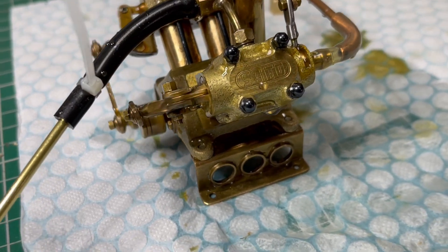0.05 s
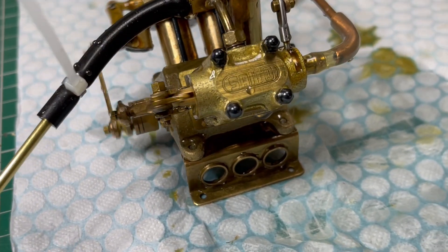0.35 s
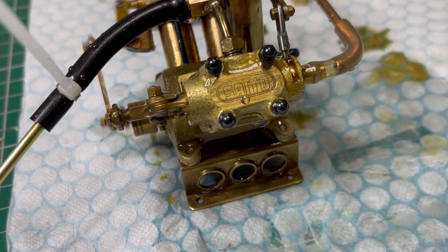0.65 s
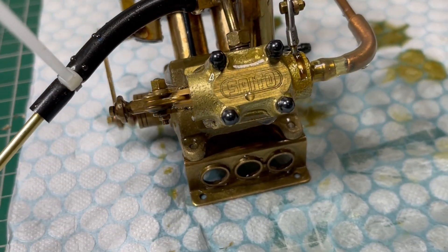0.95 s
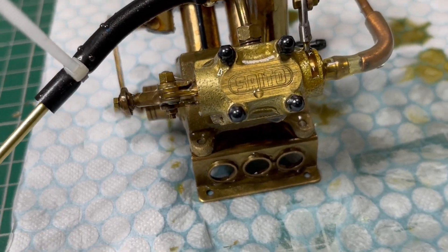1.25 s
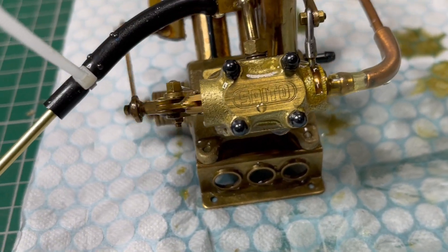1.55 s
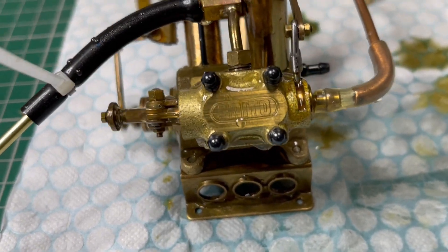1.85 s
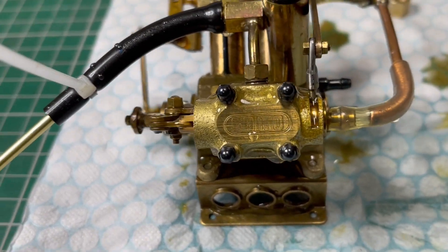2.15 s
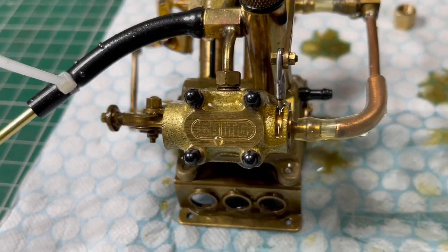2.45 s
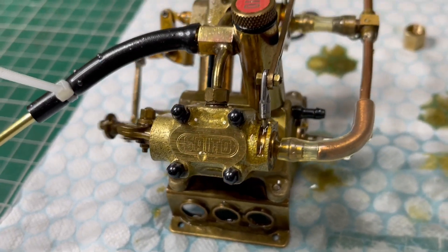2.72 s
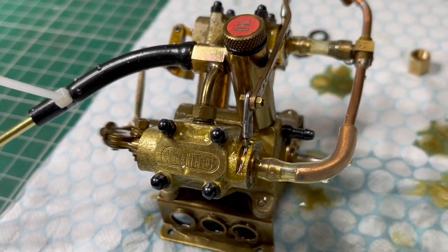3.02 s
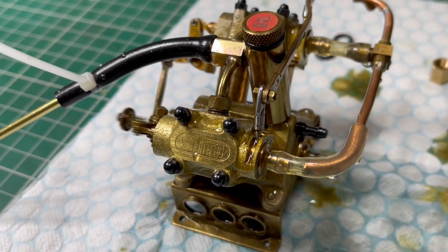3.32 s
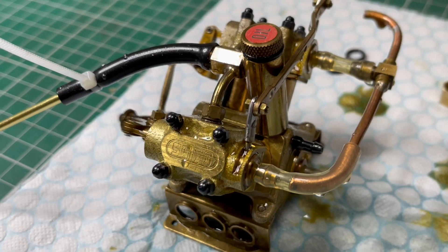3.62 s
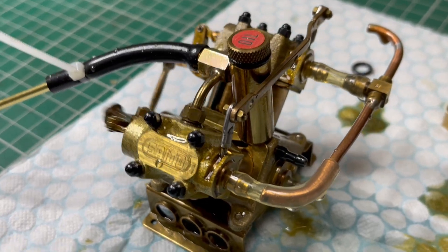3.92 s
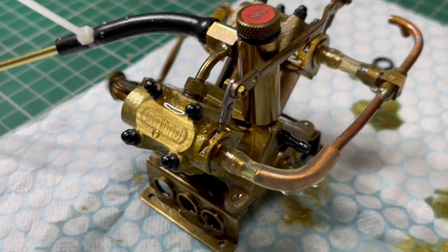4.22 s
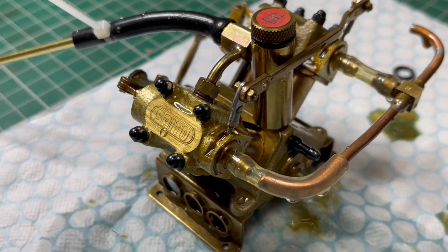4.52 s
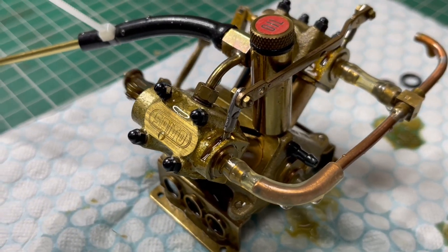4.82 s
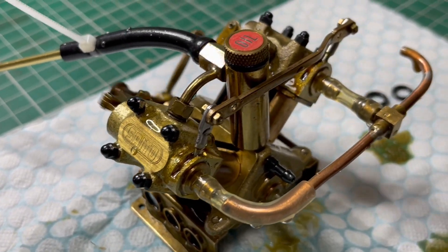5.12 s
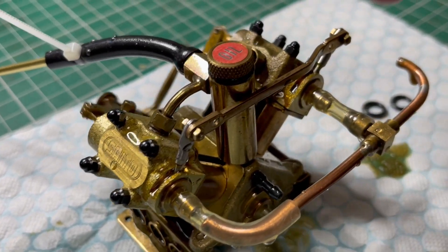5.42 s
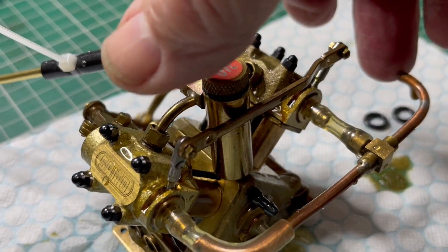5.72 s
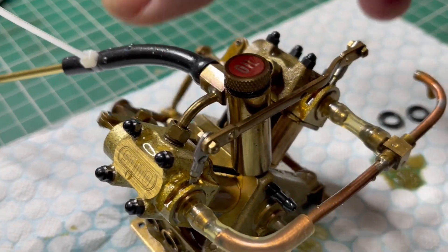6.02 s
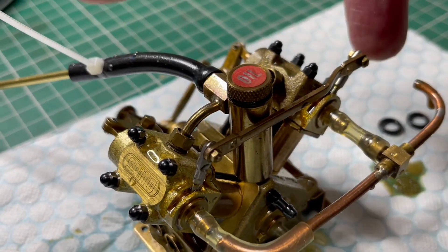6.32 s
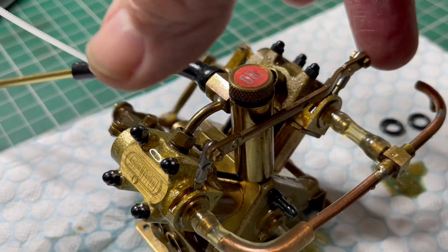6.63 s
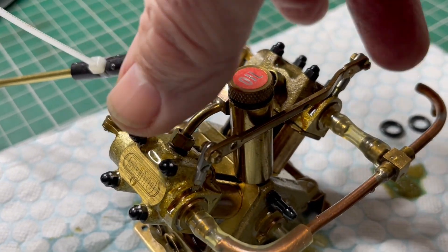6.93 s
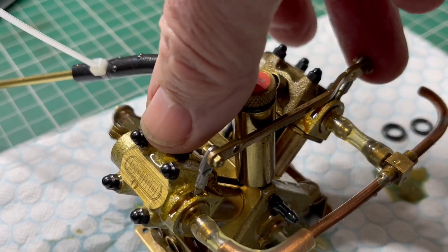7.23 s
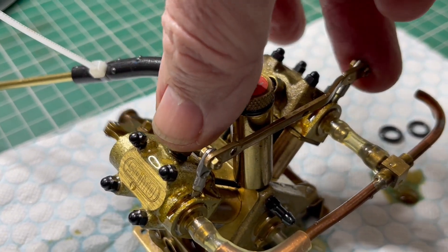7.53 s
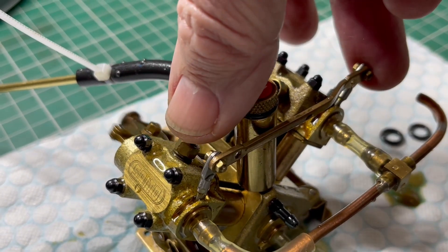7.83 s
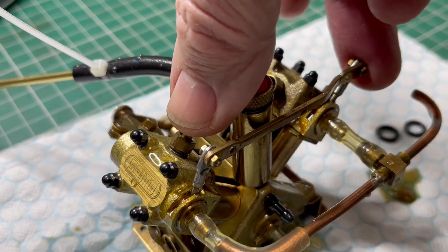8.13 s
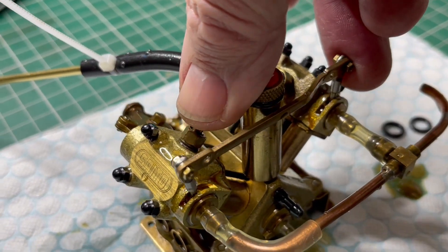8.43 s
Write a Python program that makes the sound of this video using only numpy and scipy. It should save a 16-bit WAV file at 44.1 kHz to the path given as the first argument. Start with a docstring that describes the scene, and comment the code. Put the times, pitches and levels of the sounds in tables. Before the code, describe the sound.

Heard from a close microphone moving around a workshop bench, a miniature steam engine chuffs fast and evenly, its rods clattering and its valves spitting air. The clatter softens midway, then a rush of air and a brief stumble interrupt the rhythm. The engine picks up again and runs until it stops abruptly at the very end, still hissing. A supply pump hums quietly and a distant vehicle drones underneath.

```python
"""A rapid chuffing, clacking and hissing: a small brass two-cylinder steam engine runs on compressed air.
Each turn gives four exhaust puffs, two clacks of the rods and a pulsing leak past the valves.
A finger nudges the reversing lever (the engine falters), then sets neutral: the beat stops, the leak
hisses on. The listener moves round the workbench; a supply pump hums and a vehicle drones far off."""
import sys
import numpy as np
from scipy import signal
from scipy.fft import rfft, irfft, next_fast_len
from scipy.io import wavfile
from scipy.ndimage import uniform_filter1d, map_coordinates

SR = 44100
rng = np.random.default_rng(int(sys.argv[2]) if len(sys.argv) > 2 else 0)


def master_out(mix):
    """Clip the mix to full scale and print it as 16-bit PCM to the path in sys.argv[1]."""
    frames = np.transpose(np.atleast_2d(mix))
    ceiling = np.clip(frames, -1, 1)
    pcm = np.round(ceiling * 32767).astype(np.int16)
    wavfile.write(sys.argv[1], SR, pcm)


N = 377496

STOP_S = 8.245  # the lever reaches neutral
FALTER_S, FALTER_LENGTH_S = 5.828, .065  # the half-moved lever starves the cylinders: centre, half length
# listener's path: t/s, place (0 at the cylinder, 1 above, 2 at the lever, 3 there under the hand)
VIEW = [(0, 0.3), (1.4, 0), (3, 1), (5, 1), (5.9, 1.5), (6.02, 2.5), (6.15, 3), (6.55, 3), (6.9, 2),
        (8.56, 3)]
# lever touches open the leak and shake the linkage: t/s, half length/s, sizzle gain/dB, clatter gain/dB
NUDGES = [(5.693, 0.088, 6.5, -2.5), (5.943, .06, 7, -1), (6.27, 0.23, 1.5, 6), (6.423, 0.065, 4.5, 5)]


def amp(db):
    """Decibels to amplitude ratio."""
    return 10 ** (np.asarray(db) / 20)


def unit(x):
    """Normalisation to rms 1."""
    return x / np.sqrt(np.mean(x ** 2) + 1e-20)


def clock():
    """Sample times, t/s."""
    return np.arange(N) / SR


def tone(cycles):
    """Sinusoid of rms 1 from its phase in cycles."""
    return np.sqrt(2) * np.sin(2 * np.pi * cycles)


def curves(rows):
    """Linear interpolation in time of each column after the first."""
    times, *columns = np.transpose(rows)
    return [np.interp(clock(), times, column) for column in columns]


def swell(centre_s, length_s):
    """Gaussian envelope of height 1."""
    return np.exp(-((clock() - centre_s) / length_s) ** 2)


def wobble(rate):
    """Smooth random modulation: a spline through rate knots a second."""
    return map_coordinates(rng.standard_normal(int(N * rate / SR) + 4), [np.arange(N) * rate / SR])


def colour(points):
    """Magnitude response through (f/Hz, gain/dB) points on a logarithmic frequency axis."""
    f, db = np.transpose(points)
    return lambda hz: amp(np.interp(np.log(hz + 1), np.log(f + 1), db))


def resonances(modes):
    """Superposition of damped modes (f/Hz, bandwidth/Hz, gain/dB) of alternating sign."""
    return lambda f: sum((-1) ** k * amp(db) * 1j * f * width / (hz * hz - f * f + 1j * f * width)
                         for k, (hz, width, db) in enumerate(modes))


def filtered(x, response):
    """Linear filtering: the spectrum times a frequency response."""
    size = next_fast_len(N + SR // 2)
    return irfft(rfft(x, size) * response(np.fft.rfftfreq(size, 1 / SR)), size)[..., :N]


def noise(response):
    """Filtered Gaussian noise of rms 1."""
    return unit(filtered(rng.standard_normal(N), response))


def from_view(levels_db):
    """Level along the listener's path, interpolated between places."""
    return np.interp(curves(VIEW)[0], np.arange(len(levels_db)), levels_db)


def crank(start_turn=-.153, sag_hz=1.281):
    """Crank position in turns is the integral of its speed, which sags in the falter."""
    # speed, drifting with the air supply: t/s, rotation rate/Hz
    speed = [(0.0, 18.123), (0.554, 18.209), (1.743, 18.125), (2.197, 18.334), (3.804, 18.279),
             (4.053, 17.964), (5.327, 17.827), (5.522, 17.965), (7.967, 18.047), (8.24, 17.706)]
    rate_hz = curves(speed)[0] - sag_hz * swell(FALTER_S, FALTER_LENGTH_S)
    return start_turn + np.cumsum(rate_hz) / SR


def crossings(turn, position):
    """Instants of equal crank phase, until the engine stops."""
    times = np.interp(np.arange(-1, turn[-1]) + position, turn, clock(), left=-1)
    return times[(times > 0) & (times < STOP_S)]


def rumble(level_db=-49):
    """Broadband noise from across the room, strongest in the bass."""
    # spectrum: f/Hz, relative level/dB
    spectrum = [(20, -46), (31, -34), (50, -6), (80, -6.5), (130, -15), (190, -13), (300, -14.5),
                (600, -16), (1100, -17), (1600, -27.5), (4000, -27), (15000, -73)]
    return amp(level_db) * noise(colour(spectrum))


def vehicle():
    """Transmission through walls leaves only the firing fundamental of a far engine."""
    # the drone climbs, drops back and climbs again: t/s, f/Hz, rms level/dB
    drone = [(0, 44, -62), (.9, 50, -51), (1.6, 55, -53), (2.25, 59, -56), (2.6, 62, -49), (3.1, 66, -53),
             (3.7, 68, -62), (4.0, 46, -66), (4.35, 49, -50), (4.8, 54, -58), (5.15, 58, -49),
             (5.75, 63, -45.5), (6.1, 66, -52), (6.7, 70, -51), (7.15, 72, -44.5), (7.6, 73, -53),
             (8.2, 74, -52), (8.56, 74, -60)]
    hz, db = curves(drone)
    return amp(db) * tone(np.cumsum(hz) / SR)


def whine(waver_db=2):
    """Beating: the pump motor's tone lies close to a ring of the casing."""
    # tones: f/Hz, level/dB at the cylinder, above, at the lever
    tones = [(960.2, -72, -62, -62), (946, -76, -66, -66)]
    return sum(amp(from_view(db) + waver_db * wobble(3.03)) * tone(hz * clock() + rng.random())
               for hz, *db in tones)


def pump(stroke_hz=23.89, waver_db=1, flutter_db=1.6):
    """Periodic forcing: the supply pump's strokes give a harmonic hum and ring its casing."""
    # harmonics 2 to 6 of the stroke rate: rms level/dB
    harmonics = [-54, -56, -50.5, -57.5, -58]
    # casing modes: f/Hz, bandwidth/Hz, gain/dB at the cylinder, above, at the lever
    casing = [(236, 20, -65, -63, -61), (428, 19, -65, -72, -67), (574, 22, -61, -64, -59),
              (690, 140, -66, -67, -66), (838, 30, -66, -66, -67), (888, 40, -55.5, -58, -66),
              (945, 66, -65, -58, -58), (1076, 43, -57.5, -63.5, -68), (1123, 40, -62, -63, -67),
              (1220, 45, -64, -67, -68), (1337, 25, -69, -73, -74)]
    cycle = stroke_hz * clock() + .001 * wobble(3)
    hum = sum(amp(db + waver_db * wobble(12)) * tone(order * cycle + rng.random())
              for order, db in enumerate(harmonics, 2))
    impulses = np.diff(np.floor(cycle), prepend=0) * SR / stroke_hz / np.sqrt(2)
    force = impulses * amp(flutter_db * wobble(30))
    ring = sum(amp(from_view(db)) * filtered(force, lambda f: resonances([(hz, width, 0)])(f) ** 2)
               for hz, width, *db in casing)
    return hum + ring


def room(x, t60=.12):
    """Reverberation: the workshop's diffuse field decays exponentially, differently in each channel."""
    # reverberant response: f/Hz, gain/dB
    response = [(30, -28), (100, -19), (300, -17), (600, -9.5), (1100, -3), (1600, -3.5), (2200, -40),
                (5000, -26), (11000, -20)]
    t = clock()[:SR // 3]
    tail = rng.standard_normal((2, len(t))) * amp(-60 * t / t60) * (t > .002)
    wet = signal.fftconvolve(x[None], tail / np.linalg.norm(tail[0]), axes=1)[:, :N]
    return filtered(wet, colour(response))


def echoes(x, travel_s=6, oversample=4):
    """Comb filtering: reflections off the bench and nearby parts shift as the listener moves."""
    # reflections: delay/ms at the start, delay/ms at the lever, amplitude ratio
    reflections = [(1.04, 1.18, 0.085), (2.098, 2.5, 0.069), (3.3, 3.9, -0.092), (4.6, 5.3, 0.03),
                   (7, 6.3, 0.17)]
    travel = np.clip(clock() / travel_s, 0, 1)
    fine = signal.resample_poly(x, oversample, 1)
    out = x
    for first_ms, last_ms, gain in reflections:
        delay_s = (first_ms + (last_ms - first_ms) * travel) / 1000
        out = out + gain * fine[np.maximum((clock() - delay_s) * SR * oversample, 0).astype(int)]
    return out * np.std(x) / np.std(out)


def squeak(at_s=3.298, level_db=-39, attack_s=.0091, release_s=.02):
    """Friction: a short rub beside the engine excites a few narrow modes."""
    # modes: f/Hz, bandwidth/Hz, relative level/dB
    modes = [(880, 97, 0.5), (1120, 110, -2.5), (1320, 90, -2), (1626, 59, 3), (2180, 160, -15),
             (2580, 180, -8)]
    since = clock() - at_s
    envelope = np.exp(-np.abs(since) / np.where(since < 0, attack_s, release_s))
    return amp(level_db) * envelope * noise(resonances(modes))


def shake(turn, fourth_db=-51.5, sixth_db=-51):
    """Forced vibration: the moving parts rock the bench at the fourth and sixth crank orders."""
    running = np.clip((STOP_S - clock()) / .029, 0, 1)
    fourth = tone(4 * turn) * amp(fourth_db + wobble(8.7))
    sixth = tone(6 * turn) * amp(sixth_db + wobble(24))
    return running * (fourth + sixth)


def valve_opening(turn):
    """Amplitude modulation, in dB, as the valves uncover (+) and cover (-) the leak."""
    # valve events: crank position/turns, gain/dB, lead-in/turns, fade/turns
    events = [(.185, 6.5, 0.066, 0.053), (.445, -10.5, 0.11, 0.022), (.7, 11, 0.039, 0.14),
              (.92, -7, 0.082, 0.047)]
    opening_db = 0
    for position, db, lead, fade in events:
        past = (turn - position + .5) % 1 - .5
        opening_db = opening_db + db * np.exp(-np.abs(past) / np.where(past < 0, lead, fade))
    return opening_db


def jet(turn, start_s=5.67, end_s=6.01, attack_s=.21, release_s=.042, level_db=-36.5, follow=.87):
    """Jet noise: air blows past the half-moved reversing valve, partly chopped by the strokes."""
    # spectrum: f/Hz, relative level/dB
    spectrum = [(3500, -18.5), (5000, -42.5), (6200, -11.5), (7500, -3.5), (8800, -1), (9800, -10),
                (10400, -27.5), (12000, -42)]
    t = clock()
    envelope = np.exp(np.minimum(t - start_s, 0) / attack_s - np.maximum(t - end_s, 0) / release_s)
    chopped = noise(colour(spectrum)) * amp(follow * valve_opening(turn) + wobble(300))
    return unit(chopped) * amp(level_db) * envelope


def drifting(x, depth_db=1.5):
    """Spectral modulation: the colour of a hiss drifts in slow, narrow patches."""
    spectra = signal.stft(x, nperseg=512)[2]
    patches = uniform_filter1d(rng.standard_normal(spectra.shape), size=3, axis=0)
    patches = uniform_filter1d(patches, size=90, axis=1)
    return signal.istft(spectra * amp(depth_db * unit(patches)), nperseg=512)[1][:N]


def ringing_noise(response):
    """Resonances of the metalwork colour noise differently at each listening place."""
    # resonances at the four places: f/Hz, bandwidth/Hz, lift/dB
    at_cylinder = [(2070, 270, 7.5), (2930, 270, 8), (3500, 300, -11), (4520, 320, 6.5), (5720, 1300, 4.5),
                   (7460, 1400, 2.5), (9050, 270, 4.5), (11400, 150, 3), (11570, 140, 4), (11700, 200, 1.5),
                   (12000, 250, -3)]
    from_above = [(1950, 460, 4.5), (2700, 680, 5.5), (3270, 270, 1), (4230, 600, 4), (5670, 190, 0),
                  (7880, 920, 6), (8830, 500, 5.5), (11050, 98, 12.5), (10600, 88, -7), (11440, 200, 3.5),
                  (11960, 300, 7)]
    at_lever = [(2400, 740, 9.5), (3970, 300, 4.5), (4430, 220, -1), (4848, 260, 3), (5780, 1000, 9.5),
                (8880, 210, 14), (9100, 130, -5.5), (11030, 940, 11), (11600, 160, -9), (11460, 340, 9.5)]
    under_hand = [(2300, 760, 4.5), (4120, 300, 6), (4920, 370, 6), (5720, 250, 8.5), (6300, 400, -3),
                  (7950, 400, 3), (8850, 250, 8.5), (9300, 330, 2), (9930, 120, 6), (11120, 550, 14),
                  (11780, 440, 8.5), (12400, 350, 2)]
    view = curves(VIEW)[0]
    out = 0
    for place, modes in enumerate([at_cylinder, from_above, at_lever, under_hand]):
        lift = lambda f: amp(sum(db / (1 + (2 * (f - hz) / width) ** 2) for hz, width, db in modes))
        power_share = np.clip(1 - np.abs(view - place), 0, 1)
        out = out + np.sqrt(power_share) * noise(lambda f: response(f) * lift(f))
    return drifting(out)


def leak(turn, hiss_db=-39.5, spit_db=1.57, neutral_db=4):
    """Turbulence: air spits through oil in step with the valves, and flows on steadily in neutral."""
    # spectra of the omnidirectional hiss and the high, beamed sizzle: f/Hz, relative level/dB
    hiss_spectrum = [(500, -14), (1400, -5), (2400, -11), (3650, -9.5), (4100, -1.5), (5700, -1.5),
                     (6900, 0), (7900, 3.5), (8900, 0.5), (9900, -1), (10300, -13), (11000, -15)]
    sizzle_spectrum = [(9500, -35), (10300, -24), (10650, 0), (11100, -3.7), (11900, -1.5), (12500, -3.8),
                       (13000, -29), (13600, -50), (14400, -52), (14800, -25), (15800, -17.5)]
    # sizzle as the listener crosses its beam: t/s, level/dB
    beam = [(0, -43), (2.2, -38.5), (3.2, -40.5), (4.4, -37.5), (5.35, -36), (8.2, -35.5)]
    running = np.clip((STOP_S - clock()) / .023, 0, 1)
    opening_db = running * valve_opening(turn)
    nudged_db = sum(db * swell(s, length) for s, length, db, _ in NUDGES)
    sizzle_db = curves(beam)[0] + nudged_db + neutral_db * (1 - running)  # idle cylinders take no air
    hiss = ringing_noise(colour(hiss_spectrum)) * amp(.62 * opening_db + spit_db * wobble(500))
    sizzle = ringing_noise(colour(sizzle_spectrum)) * amp(opening_db + spit_db * wobble(500))
    return unit(hiss) * amp(hiss_db) + unit(sizzle) * amp(sizzle_db)


def clack(at_s, rattle_s=.0014, size=2048):
    """Impact excitation: a brief rattle rings the brass frame, heard from the listener's place."""
    # frame modes: f/Hz, bandwidth/Hz, relative level/dB at the cylinder, above, at the lever
    brass = [(1116, 140, -6, -10, -18.5), (2027, 250, 0, -11, -13), (2390, 430, -33, -10, -8),
             (2890, 380, -3, -9.5, -7.5), (4170, 340, -6, 2.5, 2), (4460, 730, 5, -0.5, -28),
             (4870, 390, 4, -2.5, 4), (5540, 340, 5, -4.5, 1), (8000, 6000, -25, -16, -28),
             (11040, 740, -5, -8.5, -1)]
    view = np.interp(at_s, *np.transpose(VIEW))
    f = np.fft.rfftfreq(size, 1 / SR)
    frame = sum(amp(np.interp(view, np.arange(len(db)), db)) * resonances([(hz, width, 0)])(f) ** 2
                for hz, width, *db in brass)
    rattle = rng.standard_normal(size) * np.exp(-np.arange(size) / SR / rattle_s)
    ring = irfft(rfft(rattle) * frame)
    return ring * np.sqrt(.004 * SR) / np.linalg.norm(ring)  # the energy of 4 ms at rms 1


def clatter(turn, scatter_db=1.5, knock_db=-1, falter_db=-21):
    """Backlash: the rods take up their play at each dead centre, now and then with a hard knock."""
    # dead centres: crank position/turns, relative level/dB
    dead_centres = [(.185, -4.5), (.695, -2)]
    # hard knocks: t/s, level/dB before knock_db
    knocks = [(.156, -35), (.871, -34), (.9254, -32), (.9813, -30.5), (1.089, -34.5), (1.2014, -30.5),
              (1.697, -34), (1.752, -32.5), (1.8624, -31.5), (1.9724, -34.2), (2.191, -33.5),
              (2.682, -28.5), (2.955, -34), (3.5017, -34), (4.162, -35.5), (4.274, -34.5), (4.496, -36),
              (4.6644, -33.5), (4.944, -36.5), (5.1684, -31.5), (5.5045, -32), (5.5597, -33), (5.6155, -33),
              (5.727, -32), (5.783, -34), (5.957, -30), (6.069, -32), (6.180, -32.5), (6.235, -31),
              (6.318, -31), (6.346, -31.5), (6.4024, -27), (6.4573, -35), (6.8466, -33), (6.958, -34),
              (7.1796, -29.5), (7.4575, -33), (7.679, -33), (7.734, -35), (7.79, -35), (7.903, -34),
              (8.011, -29.5), (8.123, -33)]
    # clatter, weakest from above where the rods are hidden: t/s, level/dB
    strength = [(0, -36.5), (1.1, -37.5), (2.3, -36), (3, -39.5), (4, -46), (5.5, -39.5), (8.2, -37)]
    nudged_db = sum(db * swell(s, length) for s, length, _, db in NUDGES)
    level_db = curves(strength)[0] + nudged_db + falter_db * swell(FALTER_S, FALTER_LENGTH_S)
    blows = [(s, db + knock_db) for s, db in knocks]
    knock_times = np.transpose(knocks)[0]
    for position, db in dead_centres:
        for s in crossings(turn, position):
            if np.abs(knock_times - s).min() > .008:  # otherwise a knock takes this clack's place
                blows.append((s, level_db[int(s * SR)] + db + scatter_db * rng.standard_normal()))
    out = np.zeros(N + SR)
    for s, db in blows:
        ring = clack(s)
        out[int(s * SR):][:len(ring)] += amp(db) * ring
    return out[:N]


def strokes(turn, position, scatter_db=.45, jitter_s=.00009):
    """Quasi-periodic impulse train: one impulse each time the crank passes a position."""
    times = crossings(turn, position)
    late, size = rng.standard_normal((len(times), 2)).T
    at = np.clip(np.round((times + jitter_s * late) * SR), 0, N - 1).astype(int)
    return np.bincount(at, amp(scatter_db * size), N)


def exhaust(turn, cutoff_hz=145, lag_hz=451, falter_db=-5):
    """Dispersion: the bass leaves the outlet late, so each rounded puff chirps downward."""
    # puffs of one turn: crank position/turns, relative level/dB, low-pass corner f/Hz
    puffs = [(0.1695, -9, 499), (0.4509, -4.5, 260.5), (0.672, -13, 546), (0.898, -1, 255.5)]
    # pipe response: f/Hz, relative gain/dB
    pipe = [(30, 37), (55, 13), (72, 4.5), (108, 2), (150, 4.5), (215, 2), (280, 3), (330, 1.5), (385, 5),
            (470, 3.8), (560, 4), (660, 3.5), (760, 3.5), (860, 4), (1100, -13), (1500, 2), (3000, -3)]
    # the exhaust grows as the listener nears the outlet: t/s, level/dB
    strength = [(0, -37.5), (3.8, -37), (5.9, -34), (8.2, -35.5)]
    flow = 0
    for position, db, corner_hz in puffs:
        flow -= amp(db) * filtered(strokes(turn, position), lambda f: (1 + 1j * f / corner_hz) ** -4)
    high_pass = lambda f: f * f / (f * f - 1j * np.sqrt(2) * f * cutoff_hz - cutoff_hz ** 2)
    all_pass = lambda f: ((lag_hz - 1j * f) / (lag_hz + 1j * f)) ** 2
    pressure = filtered(flow, lambda f: (high_pass(f) * all_pass(f)) ** 2 * colour(pipe)(f))
    return unit(pressure) * amp(curves(strength)[0] + falter_db * swell(FALTER_S, FALTER_LENGTH_S))


def scene():
    """Superposition at two microphones, with a phase difference that grows in the treble."""
    # stereo width: f/Hz, side level/dB relative to mid
    width = [(60, -26), (330, -24), (500, -20), (900, -16), (1150, -8), (1500, -17), (1800, -20),
             (2200, -42), (2700, -20), (3000, -15), (3400, -18), (4000, -10), (5000, -10), (6200, -21),
             (7200, -22), (7700, -10), (8100, -10), (8550, -22), (9050, -3), (10000, 12), (10250, 20),
             (10500, 10.5), (11100, 0), (11600, -11), (11950, -23), (12500, -5), (13000, 2), (15000, 6.5)]
    # treble diffracts round the microphones' housing, so the leading channel swaps at: f/Hz
    swaps = [8550, 10250, 11950]
    turn = crank()
    body = exhaust(turn) + shake(turn) + squeak() + pump() + whine() + vehicle() + rumble()
    mid = body + echoes(leak(turn) + jet(turn) + clatter(turn))
    lean = np.interp(clock(), [0, 5.5], [.09, .025])  # from a little left towards the centre
    quadrature = lambda f: 1j * (-1) ** np.searchsorted(swaps, f) * colour(width)(f)
    side = filtered(mid, quadrature) + lean * body
    return np.array([mid + side, mid - side]) + room(mid)


def record(dry, top_hz=15850):
    """Band limiting: an ideal low-pass filter."""
    return filtered(dry, lambda hz: hz < top_hz)


dry = scene()
out = record(dry)
master_out(out)
```